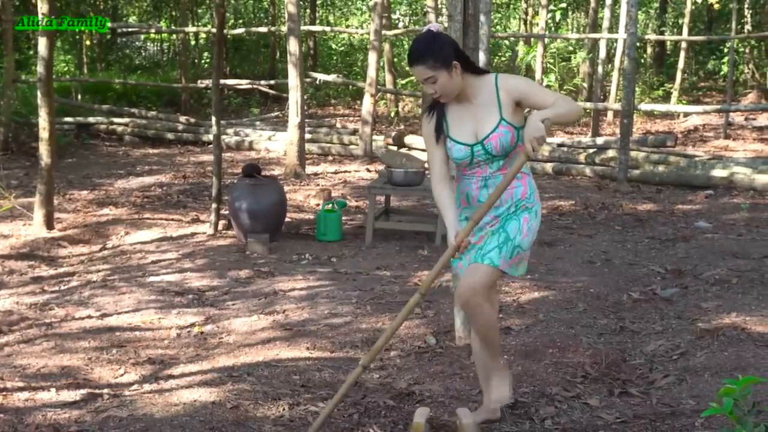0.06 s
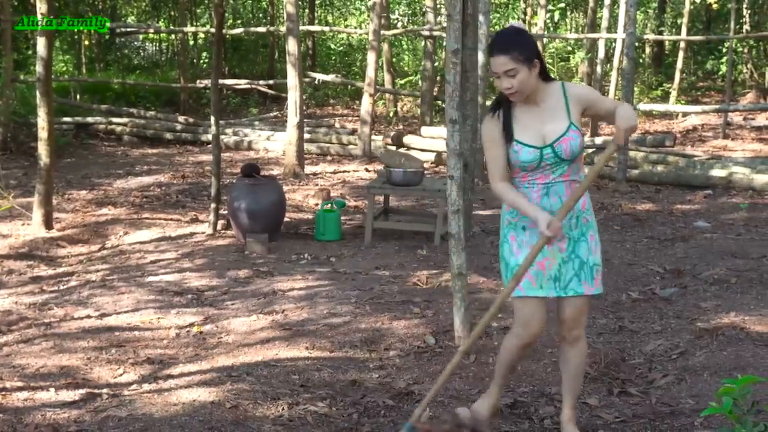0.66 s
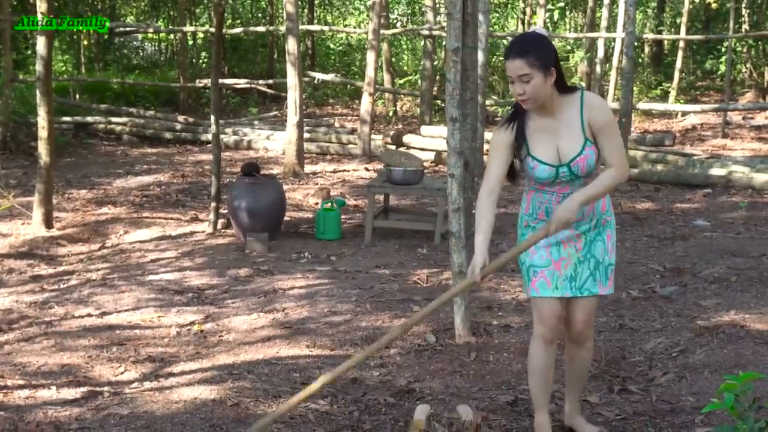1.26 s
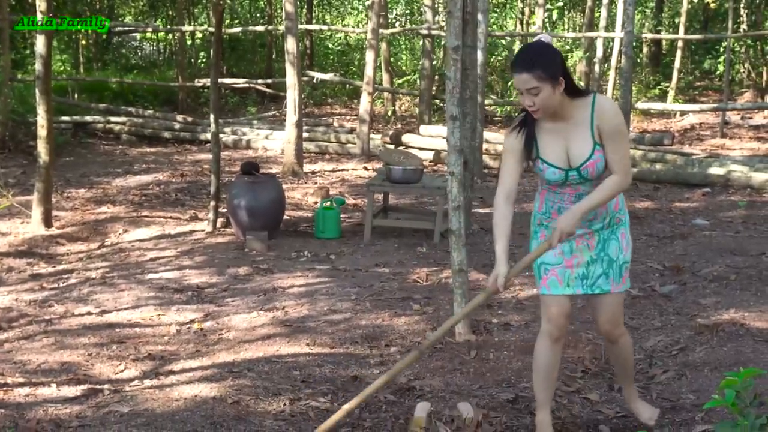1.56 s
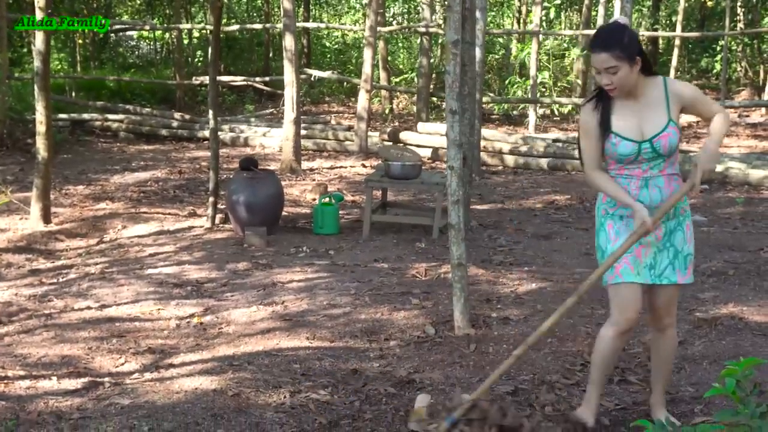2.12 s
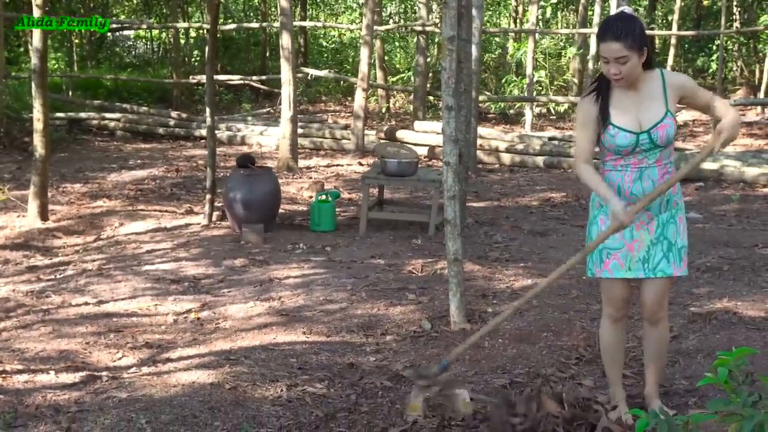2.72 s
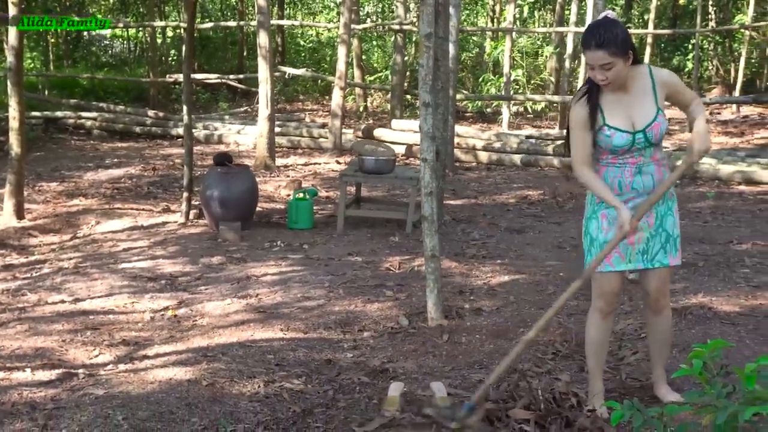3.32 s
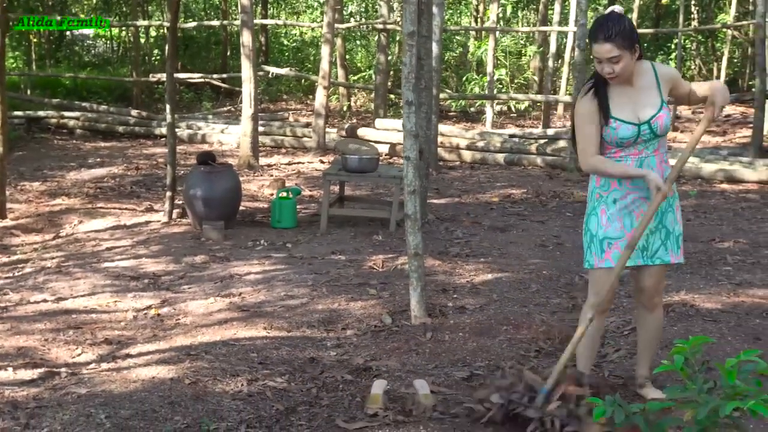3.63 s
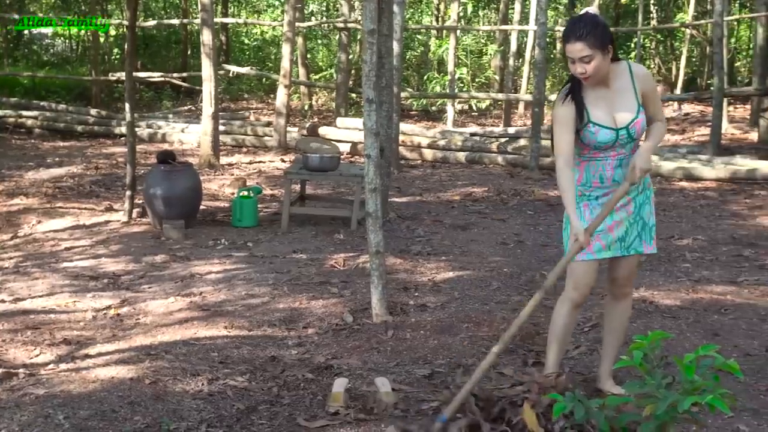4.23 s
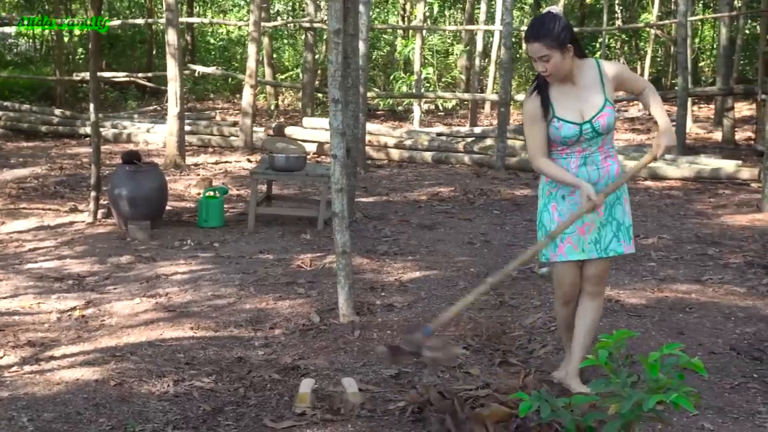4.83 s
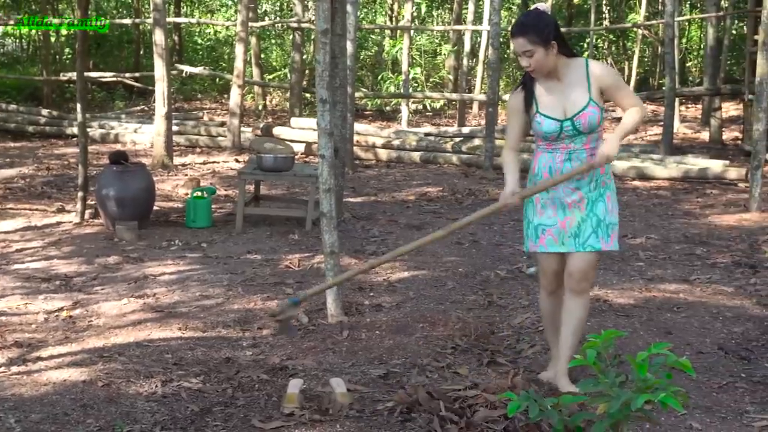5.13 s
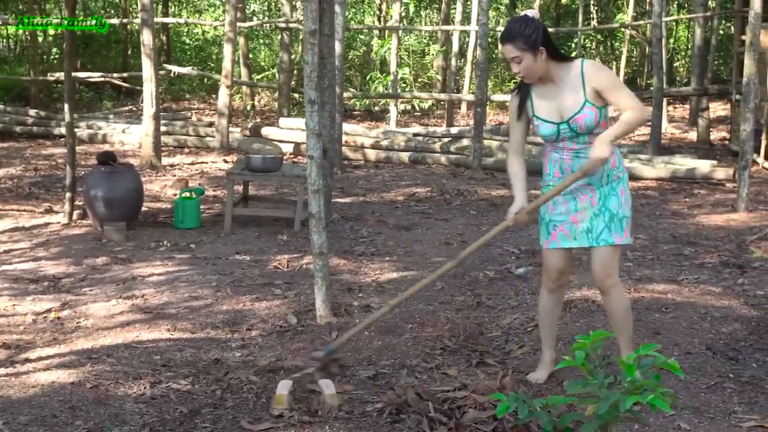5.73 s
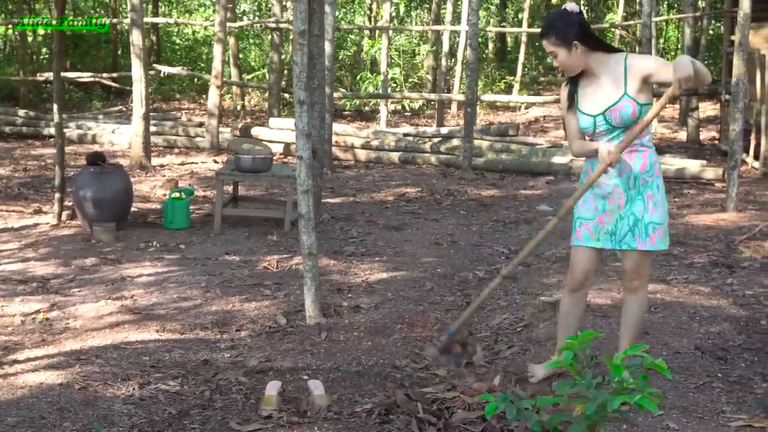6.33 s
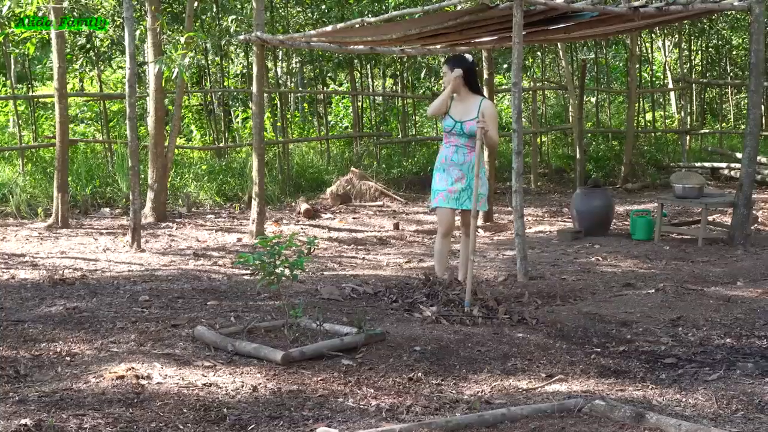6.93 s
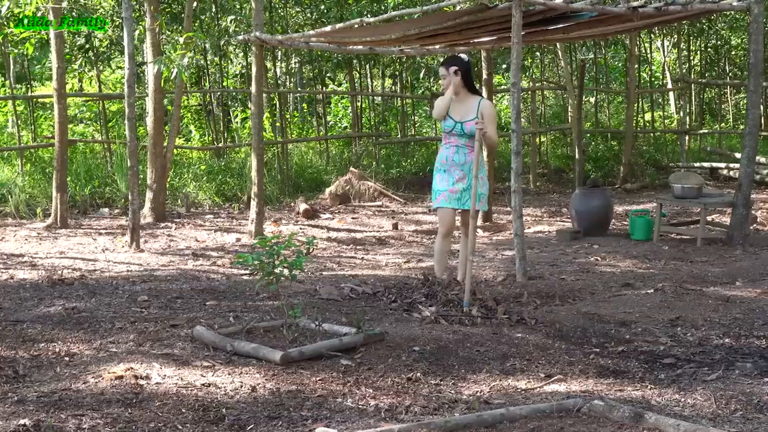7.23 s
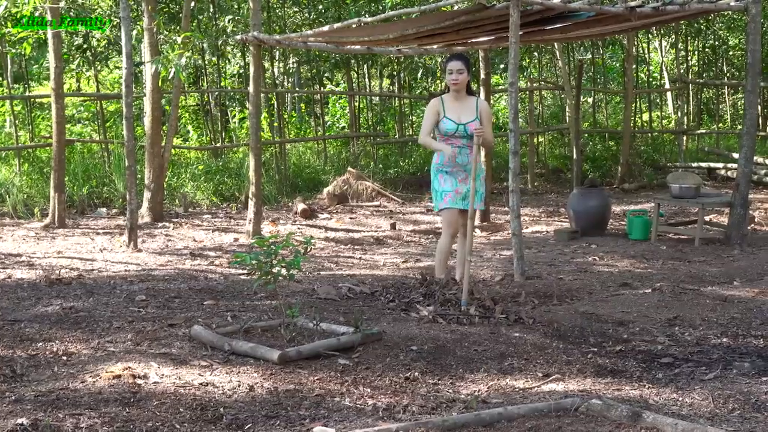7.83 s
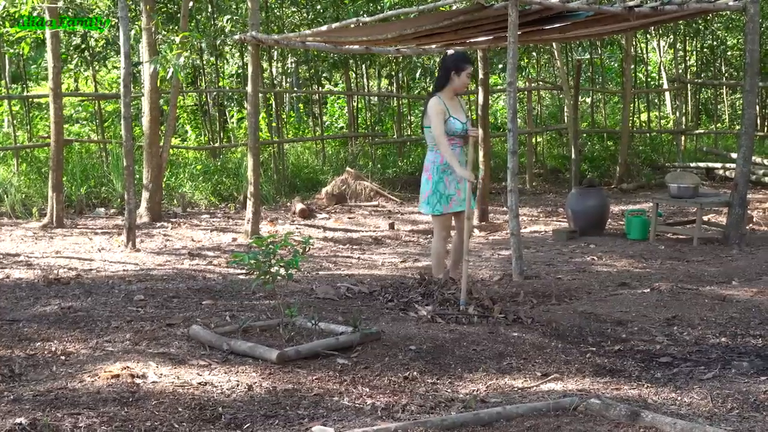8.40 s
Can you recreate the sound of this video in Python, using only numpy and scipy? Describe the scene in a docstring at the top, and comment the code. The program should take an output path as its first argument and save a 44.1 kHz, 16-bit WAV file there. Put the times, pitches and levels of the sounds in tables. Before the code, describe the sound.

A steady, shrill insect buzz fills a wood, with crickets trilling near the microphone. Much softer, a rake a few metres away scratches over soil and crackling dry leaves, stroke after stroke, its tines knocking lightly on the ground. Near the end the raking has stopped; after a faint click, the insects carry on from another spot, beside a lower-pitched cricket.

```python
"""From the start, crickets trill near 5 kHz in a wood, each wing stroke modulating their tone, over the
wide buzz of many far insects and a low hush of air. A very distant bird gives one faint note.
From 0.6 s a rake a few metres away is set down and drawn through dry leaves and soil, stroke after
stroke: leaves fracture, tines ring, soil thuds. At 6.7 s the raking is over and, after a faint click,
the wood is heard from another spot, next to a lower-pitched cricket."""
import sys
import numpy as np
from scipy import signal
from scipy.fft import rfft, irfft, next_fast_len
from scipy.io import wavfile
from scipy.ndimage import map_coordinates

SR = 44100
rng = np.random.default_rng(int(sys.argv[2]) if len(sys.argv) > 2 else 0)


def generate_wav(sig):
    """Save sig (samples, or channels by samples) to the path in sys.argv[1] as 16-bit PCM at SR."""
    pcm = np.round(np.clip(np.atleast_2d(sig).T, -1, 1) * 32767).astype(np.int16)
    wavfile.write(sys.argv[1], SR, pcm)


N = 381906
MOVE_S = 6.667  # the listening spot changes

# Song phrases of the two near crickets: start_s, pitch_hz, climb_hz
HIGH_SONG = [(-.3, 4915, 50), (.45, 4910, 52), (1.22, 4908, 67), (2, 4905, 60), (2.7, 4912, 48),
             (3.48, 4920, 62), (4.14, 4942, 38), (4.76, 4925, 52), (5.5, 4938, 27), (6.3, 4930, 70),
             (7.3, 4940, 45), (8, 4920, 65)]
LOW_SONG = [(6.66, 4725, 140), (7.9, 4772, 105)]
# Pulls of the rake: full_force_s, hold_s, rise_s, release_s, relative_rustle_db, relative_scrape_db
RAKE_PULLS = [(0.686, 0.2, .2, 0.26, -77, -73.5), (1.508, 0.018, .04, 0.23, -93, -76),
              (1.787, .28, 0.084, .3, -88.5, -77), (2.16, 0.068, 0.49, .76, -76, -71.5),
              (3.27, .02, 0.12, .15, -89, -81), (3.45, .05, 0.18, 0.76, -80, -70),
              (4.385, 0.056, 0.044, 0.28, -83.5, -67), (4.61, 0.022, .12, 0.25, -76, -70),
              (5.53, .02, 0.058, 0.37, -95, -80), (5.915, 0.2, 0.13, .41, -87, -68)]
# Tines striking ground or stone: start_s, relative_level_db, centre_hz, half_width_log_ratio
TINE_KNOCKS = [(0.644, -57, 2700, .2), (1.462, -48.5, 3100, .35), (1.484, -57, 1800, .35),
               (1.660, -59.5, 2710, 0.11), (1.778, -59, 2400, .2), (3.257, -67, 2800, .15),
               (3.382, -53, 2520, .05), (3.418, -57.5, 2700, .2), (4.383, -56, 3200, .3),
               (4.408, -53, 2400, 0.086), (4.617, -60, 2500, 0.33), (5.521, -49.5, 3900, .3),
               (5.954, -53, 2500, 0.14), (6.033, -44.5, 3000, .2)]
# The rake head digging into soil: start_s, relative_level_db, centre_hz, half_width_log_ratio
SOIL_THUDS = [(4.368, -77, 580, .22), (4.6, -82, 580, .22)]
# Resonances of the tines: frequency_hz, bandwidth_hz, relative_gain_db
TINE_MODES = [(630, 114, -12), (1550, 120, -17), (2100, 110, -13.5), (2265, 120, -6.5), (2557, 214, 2),
              (2830, 110, 0.5), (3110, 100, -4.5), (3495, 170, 0)]
# Far crickets: start_s, end_s, fade_s, pitch_hz, level_db, left_minus_right_db
FAR_SINGERS = [ (0, 9, .01, 4985, -52, 1), (0, 9, .01, 4775, -60.5, -1), (0, 9, .01, 4685, -60, -1),
               (0, 9, .01, 3965, -79, 1), (0, MOVE_S, .01, 4915, -55, 0), (2.55, 4.1, .12, 4360, -65, -5),
               (4.1, 5.1, .2, 4360, -71, -5), (4.9, 6.6, .1, 3500, -85, 0),
               (MOVE_S, 9, .01, 4790, -49.5, 0), (MOVE_S, 9, .01, 4920, -53, 0),
               (MOVE_S, 9, .01, 4590, -63, -2), (MOVE_S, 9, .01, 4450, -72, 0),
               (MOVE_S, 9, .01, 3820, -78.5, 0), ]
# Spectra of the leaves, the buzz at each spot and the air: frequency_hz, relative_density_db
LEAF_SPECTRUM = [(150, -34), (400, -26), (900, -6.5), (1150, -6), (1450, -1), (1850, -2), (2400, -1),
                 (3300, 2), (4200, 4), (8000, -9), (15000, -13)]
FIRST_BUZZ_SPECTRUM = [(3300, -58), (4400, -21), (5200, -8), (5450, -3.5), (6100, -5.5), (6750, 1),
                       (7300, -5.5), (7650, -5), (8100, -13), (9300, -20), (10000, -20), (11000, -28),
                       (15000, -33), (16000, -42)]
SECOND_BUZZ_SPECTRUM = [(3500, -54.5), (4500, -25.5), (5250, -7.5), (5450, -1.5), (6000, -2.5), (6500, 0.5),
                        (7150, 0), (8100, -10.5), (9400, -20), (9950, -18.5), (11200, -27.5), (15000, -32),
                        (16000, -35.5)]
AIR_SPECTRUM = [(25, -30), (45, -20), (90, -6.5), (130, -4), (170, -8), (240, -6.5), (500, -4),
                (1000, -4.5), (2400, -12.5), (3900, -11.5)]
# Likeness of left and right for the buzz and the air: frequency_hz, correlation
BUZZ_CORRELATION = [(4500, -0.28), (6000, 0.085), (7200, -0.16), (8700, -0.14), (10000, .05), (13000, 0.45),
                    (15500, 0.55)]
AIR_CORRELATION = [(100, .98), (500, 0.93), (2000, 1)]
# The distant bird's note: middle_s, half_length_s, pitch_hz, level_db
BIRD_NOTE = (.32, .11, 1335, -87.5)


def near_crickets():
    """Stridulation: two close crickets sing with their wings, the lower heard only at the second spot."""
    high = trill(phrase_pitch(HIGH_SONG), 54, depth=.16, bend_rad=1.25, rough_rad=.19, flutter_db=.6,
                 lead_rad=.6)
    low = trill(phrase_pitch(LOW_SONG), 55, depth=.3, bend_rad=1.1, rough_rad=.4, flutter_db=1.2)
    high, low = (unit(among_trees(song, wet_db=-4.5, t60_s=.2)) for song in (high, low))
    return high * amp(by_spot(-45.5, -49.5)) * pan(3.9) + low * by_spot(0, amp(-46)) * pan(2.9)


def trill(pitch_hz, stroke_hz, depth, bend_rad, rough_rad, flutter_db, lead_rad=0):
    """Modulation: each wing stroke swells the tone and bends its pitch, splitting it into sidebands."""
    stroke = 2 * np.pi * np.cumsum(stroke_hz * (1 + .035 * wobble(12))) / SR
    swell = (1 + depth * np.cos(stroke)) * amp(flutter_db * wobble(100))
    carrier = 2 * np.pi * np.cumsum(pitch_hz) / SR
    bend = bend_rad * np.cos(stroke - lead_rad)  # positive lead: loudest while the pitch is high
    return unit(swell * np.sin(carrier + bend + rough_rad * wobble(150)))


def phrase_pitch(phrases, sag_s=.2, end_s=8.8):
    """Frequency glide: each phrase climbs, more slowly near the top, then sags into the next."""
    starts = [row[0] for row in phrases] + [end_s]
    progress = np.linspace(0, 1, 10)
    times = [start + (end - sag_s - start) * progress for start, end in zip(starts, starts[1:])]
    pitches = [hz + climb_hz * progress ** .85 for _, hz, climb_hz in phrases]
    return np.interp(clock(), np.ravel(times), np.ravel(pitches))


def rake():
    """Friction and impact: leaves crackle, grit and knocks ring the tines, and the soil thuds."""
    rustle, scrape = pulls()
    leaves = unit(filtered(crackle(rate_hz=550, hiss=.93), lambda hz: amp(along(LEAF_SPECTRUM, hz))))
    leaves *= rustle * amp(8.5 + 1.9 * wobble(35))
    grit = scrape * amp(2.2 * wobble(45)) * crackle(rate_hz=350, hiss=1)
    knocks = amp(-16.5) * impacts(TINE_KNOCKS, t60_s=.12)
    tines = filtered(grit + knocks, tine_response)
    soil = impacts(SOIL_THUDS, t60_s=.2)
    return among_trees(leaves + tines + soil, wet_db=-25.5, t60_s=.25) * by_spot(1, 0)


def pulls():
    """Exponential envelopes: a pull gains 20 dB per rise time, holds, then loses 20 dB per release."""
    t, rustle, scrape = clock(), np.zeros(N), np.zeros(N)
    for full_s, hold_s, rise_s, release_s, rustle_db, scrape_db in RAKE_PULLS:
        before = np.maximum(full_s - t, 0) / rise_s
        after = np.maximum(t - full_s - hold_s, 0) / release_s
        effort_db = -20 * (before + after)
        rustle = np.maximum(rustle, amp(rustle_db + effort_db))
        scrape = np.maximum(scrape, amp(scrape_db + effort_db))
    return rustle, scrape


def crackle(rate_hz, hiss):
    """Shot noise: tiny fractures of unequal size occur at random over smooth friction noise."""
    signs = (rng.random(N) < rate_hz / SR) * rng.choice([-1, 1], N)
    snaps = signs * rng.exponential(size=N) ** .5
    return unit(unit(snaps) + hiss * rng.standard_normal(N))


def tine_response(hz):
    """Modal resonance: the tines respond to force as a sum of damped oscillators."""
    return sum(amp(db + 11) * 1j * hz * width_hz / (mode_hz ** 2 - hz ** 2 + 1j * hz * width_hz)
               for mode_hz, width_hz, db in TINE_MODES)


def impacts(events, t60_s, rise_s=.0038):
    """Damped transients: each contact is a band of noise that swells fast and decays exponentially."""
    contacts, t = np.zeros(N), np.arange(SR // 4) / SR
    envelope = (1 - np.exp(-t / rise_s)) * amp(-60 * t / t60_s)
    for start_s, db, centre_hz, half_width in events:
        edges_hz = centre_hz * np.exp([-half_width, half_width])
        band = signal.butter(1, edges_hz, "bandpass", fs=SR)
        puff = unit(signal.lfilter(*band, rng.standard_normal(len(t))))
        contacts[round(start_s * SR):][:len(t)] += amp(db) * envelope * puff
    return contacts


def far_crickets():
    """Reverberation blurs the far singers, each climbing and sagging in pitch at its own pace."""
    songs = np.zeros((2, N))
    for start_s, end_s, fade_s, hz, db, left_db in FAR_SINGERS:
        phrases = clock() * rng.uniform(1, 1.4) + rng.random() + .15 * wobble(1)
        pitch_hz = hz + 38 * signal.sawtooth(2 * np.pi * phrases, .75) + 20 * wobble(45)
        song = trill(pitch_hz, rng.uniform(44, 64), depth=.25, bend_rad=.8, rough_rad=.45, flutter_db=1)
        songs += song * amp(db) * between(start_s, end_s, fade_s) * pan(left_db)
    return among_trees(songs, wet_db=1, t60_s=.37)


def insect_chorus():
    """A sound field varies with position: each spot has its own spectrum and level of buzz."""
    first = buzz(FIRST_BUZZ_SPECTRUM, click_hz=321, depth=.07)
    second = buzz(SECOND_BUZZ_SPECTRUM, click_hz=356, depth=.11)
    return by_spot(amp(-40.5) * first * pan(1.7), amp(-42) * second * pan(2.4))


def buzz(spectrum, click_hz, depth):
    """Incoherent summation: countless insects merge into hiss, modulated by the closest one's clicks."""
    clicks = 1 + depth * np.cos(2 * np.pi * np.cumsum(click_hz + .63 * wobble(2.8)) / SR)
    swell = amp(.26 * wobble(8))
    return stereo_field(rng.standard_normal((2, N)) * clicks * swell, spectrum, BUZZ_CORRELATION)


def bird():
    """Random phase modulation makes one note from deep in the wood hoarse."""
    middle_s, half_s, hz, db = BIRD_NOTE
    tone = np.sin(2 * np.pi * hz * clock() + 2.6 * wobble(190))
    note = tone * between(middle_s - half_s, middle_s + half_s, fade_s=.027)
    return amp(db) * among_trees(note, wet_db=-7, t60_s=.4)


def click():
    """An impulse, flat in spectrum, marks the abrupt change of spot."""
    return amp(-38.5) * (np.arange(N) == round(MOVE_S * SR))


def air():
    """Ambient noise: the faint low hush of the wood, nearly the same at both ears."""
    hush = stereo_field(rng.standard_normal((2, N)), AIR_SPECTRUM, AIR_CORRELATION)
    return hush * amp(by_spot(-86, -88) + .24 * wobble(3))


def among_trees(direct, wet_db, t60_s):
    """Scattering: trunks add a decaying tail to the direct sound, different at each ear."""
    t = np.arange(SR // 2) / SR
    tail = rng.standard_normal((2, len(t))) * amp(-60 * t / t60_s)
    tail /= np.linalg.norm(tail, axis=1, keepdims=True)
    scattered = signal.oaconvolve(np.atleast_2d(direct), tail, axes=1)[:, :N]
    return (direct + amp(wet_db) * scattered) / np.hypot(1, amp(wet_db))


def stereo_field(pair, spectrum, correlation):
    """Partial coherence: the balance of independent mid and side noise sets how alike the ears are."""
    def response(hz):
        angle = np.arccos(along(correlation, hz)) / 2
        return amp(along(spectrum, hz)) * [np.cos(angle), np.sin(angle)]
    mid, side = filtered(pair, response)
    return unit(np.array([mid + side, mid - side]))


def filtered(x, response):
    """Linear filtering: the spectrum is multiplied by a frequency response."""
    size = next_fast_len(N + SR // 4, True)
    return irfft(rfft(x, size) * response(np.fft.rfftfreq(size, 1 / SR)), size)[..., :N]


def by_spot(first, second):
    """A rapid crossfade from the first spot's value to the second's."""
    moved = .5 + .5 * np.tanh((clock() - MOVE_S) / .001)
    return first + (second - first) * moved


def between(start_s, end_s, fade_s):
    """A time window with soft edges."""
    t = clock()
    return .25 * (1 + np.tanh((t - start_s) / fade_s)) * (1 + np.tanh((end_s - t) / fade_s))


def wobble(rate_hz):
    """Smooth fluctuation: a spline through rate_hz random knots a second."""
    knots = rng.standard_normal(int(N * rate_hz / SR) + 4)
    coarse = np.arange(0, N, 16)
    return np.interp(np.arange(N), coarse, map_coordinates(knots, [coarse * rate_hz / SR]))


def along(points, hz):
    """Interpolation on a logarithmic frequency axis."""
    knots_hz, values = np.transpose(points)
    return np.interp(np.log(hz + 1), np.log(knots_hz + 1), values)


def pan(left_db):
    """Interaural level difference as two channel gains."""
    return amp([[left_db / 2], [-left_db / 2]])


def amp(db):
    """Decibels to amplitude ratio."""
    return 10 ** (np.asarray(db) / 20)


def unit(x):
    """Normalisation to rms 1."""
    return x / np.sqrt(np.mean(x ** 2) + 1e-20)


def clock():
    """Sample times in seconds."""
    return np.arange(N) / SR


def scene():
    """Superposition: insects all around, the rake in the middle."""
    return near_crickets() + far_crickets() + insect_chorus() + rake() + bird() + air() + click()


def record(dry):
    """Windowing softens both ends; a low-pass filter limits the band."""
    ends = between(.0005, N / SR - .0005, fade_s=.0002)
    return filtered(dry * ends, lambda hz: hz < 15760)


dry = scene()
out = record(dry)
generate_wav(out)
```